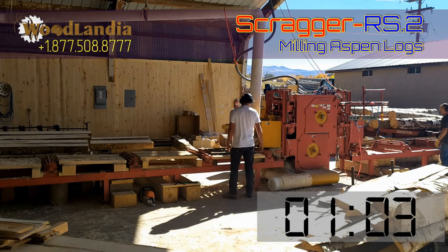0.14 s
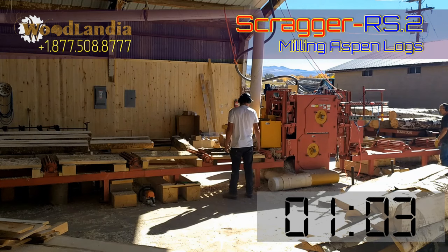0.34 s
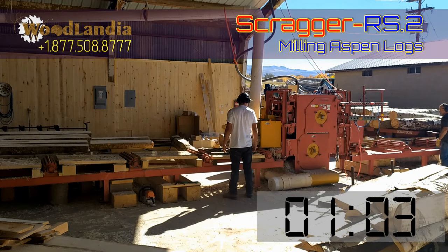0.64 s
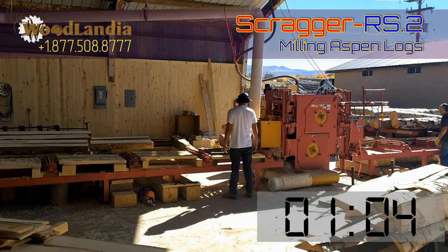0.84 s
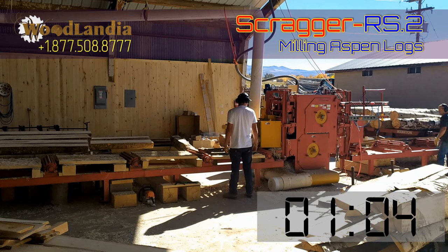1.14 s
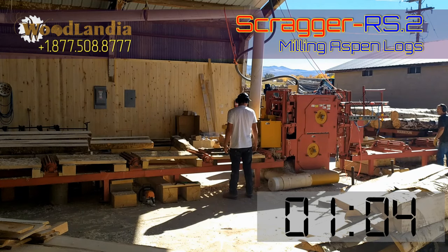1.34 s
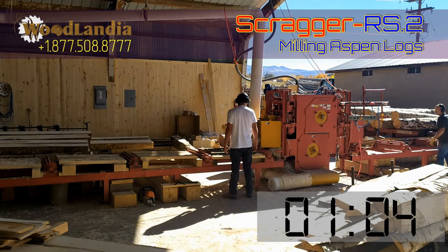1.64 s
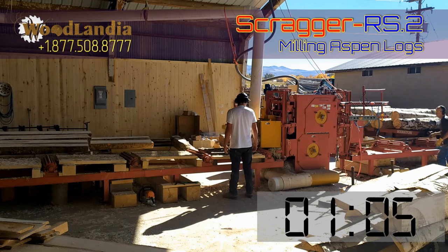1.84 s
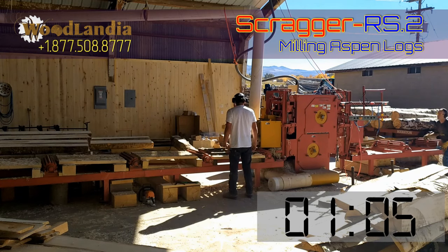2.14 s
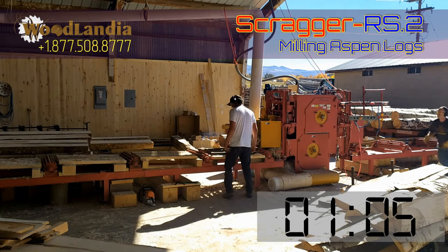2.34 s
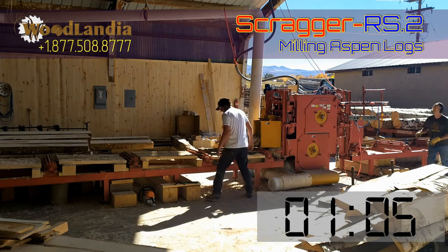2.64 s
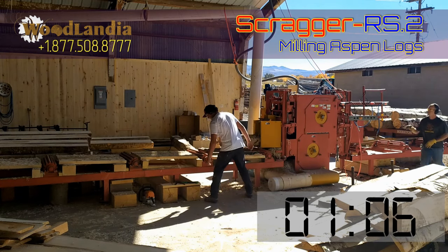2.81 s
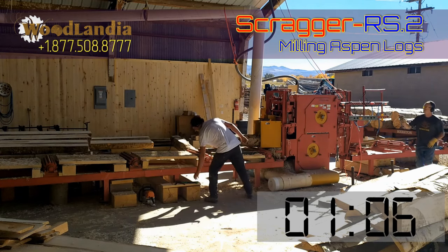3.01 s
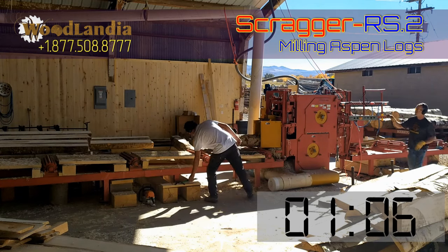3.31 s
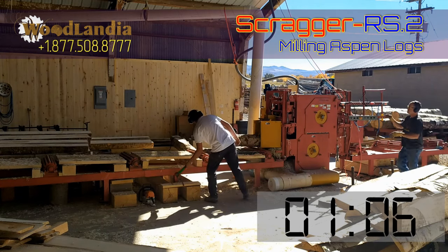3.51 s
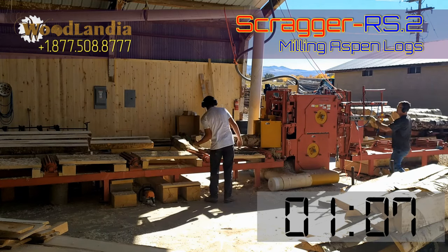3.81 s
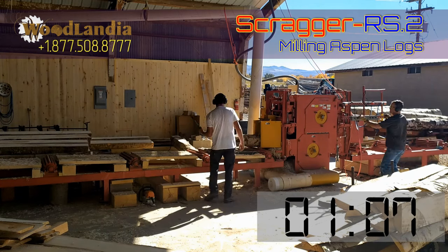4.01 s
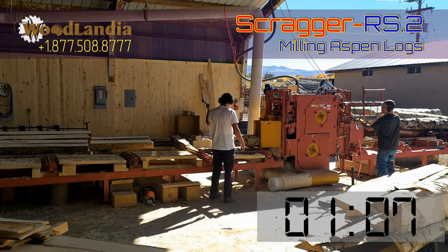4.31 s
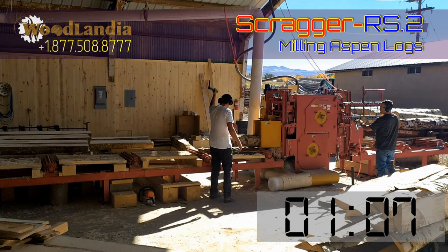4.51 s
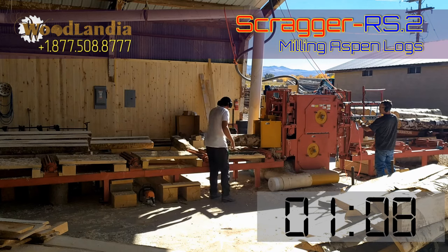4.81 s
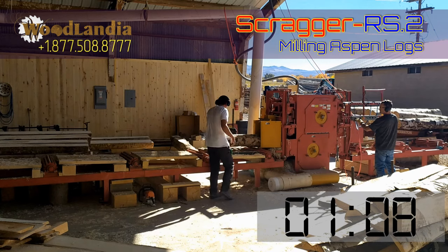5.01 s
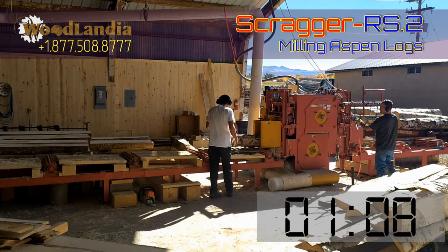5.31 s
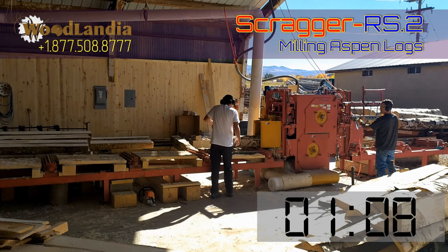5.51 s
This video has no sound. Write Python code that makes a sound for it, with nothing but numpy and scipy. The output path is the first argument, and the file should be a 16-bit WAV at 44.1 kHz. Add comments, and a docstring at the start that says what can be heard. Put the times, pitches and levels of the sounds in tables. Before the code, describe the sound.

A sawmill machine runs throughout in an open-sided shed, heard in wide stereo with thin deep bass. Its hydraulic pump makes a steady buzzing whine, strongest near 900 Hz, with higher whines around 1.1 to 1.3 kHz and a fast throb. Beneath are low hums and steel-frame rumble; above, idling blades hiss, slowly fading. Air valves spit in short whistling bursts with metallic knocks at about 0.3, 0.7-0.85, 2.8 and 4.1 seconds; weaker puffs come near 0.55, 1.7, 1.9 and 2.1. Each leaves a short, dull shed tail. A faint high squeal sings at the start and again around 3.8-4.1. At about 4.65 the blades bite into a log: bright dusty spray, then coarse tearing, groaning and booming in uneven surges, with a momentary dip near 4.9. A rough blade note wavers around 850 Hz, the drive growls, swelling near 5.1, and the pump whine surges near 5.4. Cutting continues to the end at about 5.6.

```python
"""A hydraulic piston pump whines in a sawmill under an open shed roof: sine partials on one pump cycle.
Weaker machine tones drone beside it; the steel frame and the idling blades are shaped noise.
Air valves let off short noise blasts with a dull shed tail, their pipes whistle, and struck steel parts ring.
Near the end the blades bite into a log: noise sprays, wood resonances groan and boom, a blade note and the
drive's growl join in, and the pump changes colour under load."""
import sys
import numpy as np
from scipy import signal
from scipy.io import wavfile

SR = 44100
rng = np.random.default_rng(int(sys.argv[2]) if len(sys.argv) > 2 else 0)


def inscribe(sig):
    """Save sig as 16-bit PCM at rate SR to the path in sys.argv[1].

    A 1-D sig is mono; a 2-D sig holds one channel per row.
    Samples are clipped to [-1, 1] before scaling.
    """
    pcm = np.round(np.clip(np.atleast_2d(sig).T, -1, 1) * 32767)
    wavfile.write(sys.argv[1], SR, pcm.astype(np.int16))


N = 249295
TIME = np.arange(N) / SR   # s

# All levels are relative, ahead of each layer's own gains and movements.
# pump partials: multiple of the pump cycle, level/dB, change under load/dB, left-right/dB
PUMP_PARTIALS = [(1, -43, -7, 0), (2, -45, -4, 4), (3, -34, -7, -1), (5, -36.5, 3, -1), (9, -43, 5, 0),
                 (10, -45, -5, -1), (11, -44, 3, -3), (12, -35, 2, -11), (14, -42, 2, 1), (15, -28, -2, 0),
                 (16, -40, -3, -11), (17, -42, 0, 3), (18, -32, -2, 5), (19, -39, -7, -7), (20, -40, -4, 1),
                 (21, -33.5, .5, -1), (22, -42, 3, -11), (23, -44, -1, -10), (24, -35, -2, -4),
                 (25, -44, -3, -11), (26, -47, -7, -1), (27, -41, -1, -7), (30, -42, 0, -3),
                 (32, -50, -7, -8), (33, -46, 5, -5), (35, -49, -7, -1), (36, -48, 4, 3), (37, -51, 0, 0),
                 (39, -46, -1, -2), (42, -45, 1, -5), (45, -47, 5, -1)]
# partials that grow or fade while the pump idles: multiple of the pump cycle -> slope/(dB per s)
PARTIAL_TRENDS = {5: 1.2, 9: 2, 21: 1.3, 24: -.9}
# movement of the pump's main whine: t/s, level/dB
MAIN_WHINE = [(0.0, 4), (2.08, 0.5), (3.32, 2), (3.6, -2), (3.95, 0.5), (4.3, -3), (4.62, -1), (4.71, -5),
              (4.77, -1), (4.84, -15), (5.0, 1.5), (5.13, 4), (5.25, -5), (5.4, 9.5), (5.53, -3),
              (5.65, -11)]
# thin high overtones of the piston rate: multiple of the pump cycle, level/dB
SIZZLE_PARTIALS = [(48, -47.5), (51, -48.5), (54, -50), (57, -51), (60, -45), (63, -47), (66, -48),
                   (69, -52), (72, -48), (75, -47), (78, -51), (81, -53), (84, -49), (87, -48), (90, -53),
                   (93, -50), (99, -51), (102, -49), (105, -48), (108, -47)]
# weaker steady tones beside the pump's main partials (shaft sidebands, belts, a hum neighbour): f/Hz, level/dB
SIDE_DRONES = [(68, -50), (87.7, -41.5), (99.6, -46), (147.5, -46.5), (155.7, -41), (260, -46.5),
               (293.6, -41.5), (355.6, -42), (379.8, -45.5), (519.5, -44.5), (559.7, -48), (739.4, -41.5),
               (799.5, -45), (859.4, -65), (1399.3, -44)]
# resonances of the steel frame: f/Hz, width/Hz, level/dB
FRAME_RESONANCES = [(62.3, 19, -44), (148, 13.4, -39.5), (183, 21, -37.5), (294.3, 31, -41),
                    (544, 26, -42.5)]
# noise spectra of frame, idling blades, air jet, sawdust and groaning wood: f/Hz, level/(dB per Hz)
RUMBLE_SPECTRUM = [(25, -66), (42, -77), (62, -56.5), (100, -56), (175, -54), (240, -57), (320, -55.5),
                   (500, -63), (850, -59.5), (1250, -61.5), (2000, -69.5), (5000, -84.5)]
HISS_SPECTRUM = [(300, -103), (1000, -63), (1800, -64), (2600, -64.5), (4000, -65.5), (6000, -68),
                 (8700, -67), (10000, -89.5), (12500, -79.5)]
AIR_SPECTRUM = [(500, -59.5), (800, -57), (1300, -57.5), (1800, -60.5), (2600, -57.5), (4500, -59.5),
                (6500, -59.5), (9000, -59.5), (10500, -70), (12500, -78)]
SPRAY_SPECTRUM = [(600, -86), (1600, -61.5), (2500, -59.5), (4000, -60), (6000, -64.5), (8700, -63),
                  (10000, -75), (12500, -73.5)]
GROAN_SPECTRUM = [(350, -72), (480, -53.5), (650, -62.5), (850, -52), (1100, -65), (1500, -56), (3000, -91)]
# faint high pump overtones that stand out for a moment: start t/s, end t/s, f/Hz, level/dB
PUMP_SQUEALS = [(0, .7, 3100, -42), (3.76, 4.15, 3778, -38)]
# air blasts: t/s, level/dB, opening/s, blowing/s, tilt/dB (added to treble, taken off bass),
# pipe f/Hz, pipe level/dB
VALVE_BLASTS = [(.235, -11, 0.013, 0.06, -5, 3000, -38), (0.323, -5, 0.007, 0.07, -5, 3040, -29),
                (.545, -19, .01, 0.03, 7, 3070, -51), (.72, -0.5, 0.015, 0.052, 0.5, 2530, -24.5),
                (.822, -10, 0.0073, .036, -8, 2480, -27), (1.695, -14.5, .009, .036, 4, 2550, -55),
                (1.89, -11, .013, .031, 1, 2550, -55), (2.13, -17, .01, .03, 9, 2550, -55),
                (2.764, -0.7, 0.026, 0.055, 1, 3150, -28), (2.85, -14, 0.009, 0.03, -10, 3160, -29),
                (4.124, -2, 0.0044, 0.055, -2, 2490, -32), (4.22, -15.5, .01, 0.1, -8, 2380, -31)]
# knocks of the air-driven steel parts: t/s, level/dB
STEEL_KNOCKS = [(0.333, -4), (.724, -4), (.757, 0), (.83, -7), (2.769, -5), (2.797, -1), (2.865, -2),
                (2.912, -11), (4.128, -3), (4.182, -2)]
# ringing of those parts: f/Hz, level/dB, t60/s
STEEL_RINGS = [(1110, -36, .06), (1840, -35, 0.061), (2190, -34, 0.049), (2410, -31, .08),
               (3210, -31, 0.043), (3870, -37, .09), (4480, -30, .07), (5120, -35, .07), (6450, -35, .06)]
# resonances of the log and carriage under the teeth: f/Hz, width/Hz, level/dB
LOG_RESONANCES = [(254, 18, -36.5), (299, 20, -36), (347, 13, -42), (712.6, 9.5, -33), (785, 16, -36),
                  (848, 19, -40), (884, 35, -31), (1024, 25, -43), (1414, 20, -37), (1627, 45, -33)]
# moments when the teeth dig in harder: t/s, half length/s, extra groan/dB, extra boom/dB, extra chips/dB
TOOTH_SURGES = [(4.8, .045, 1, 3, -1), (4.995, 0.02, 2, 7, 4), (5.095, 0.048, 0, 3, 3),
                (5.18, .035, 0.5, 4, -2.5), (5.308, 0.036, -0.5, 5.5, 1), (5.386, .045, 0.5, 5, -1),
                (5.556, 0.048, -2.5, 3, 0)]
# note of a blade in the wood: t/s, f/Hz, level/dB
BLADE_PITCH = [(4.66, 880, -54), (4.71, 868, -29), (4.8, 846, -37), (4.88, 800, -39), (4.98, 850, -38),
               (5.1, 833, -40), (5.24, 849, -32), (5.35, 825, -41), (5.45, 851, -38), (5.59, 848, -34),
               (5.65, 838, -34)]
# growl of the loaded drive: multiple of its pitch, level/dB
GROWL_PARTIALS = [(4, -37), (5, -41), (8, -41), (9, -39), (10, -34), (11, -34), (14, -40), (16, -39),
                  (18, -37), (20, -39), (21, -37), (24, -41)]
# likeness of the two sides in the noises: f/Hz, correlation
SIDE_LIKENESS = [(60, 0.88), (180, 0.85), (350, 0.77), (700, 0.28), (1400, 0.076), (2800, 0.082),
                 (5500, -0.21), (9000, 0.0083)]
# which side the banded noises lean to: f/Hz, left-right/dB
SIDE_LEAN = [(60, 2), (160, 1), (1000, 2), (2000, -1.5), (4000, -0.5), (8000, 0.5), (12000, 2.5)]
# how far the left side leads in the standing waves of the shed: f/Hz, lead/rad
SIDE_LEAD = [(60, 0), (430, -0.56), (720, -1.68), (900, 0.78), (1080, 1), (1260, 2.0), (1440, 1.22),
             (1800, 2), (2330, 1.0), (3500, 1.5), (5000, 4.5)]

# pump cycle rate: the motor sags a little under load
IDLE_HZ, LOADED_HZ = 59.97, 59.8
# multiples of the pump cycle that carry the main whine, the upper whines and the low hum
MAIN_ORDER, UPPER_ORDERS, HUM_ORDER = 15, (18, 21), 5
# the upper whines sink under load, then swell once deep in the cut
UPPER_LOAD_DB, PEAK_S, PEAK_HALF_S, PEAK_DB = -4, 5.45, 0.21, 11
# the low hum swells and fades at random
HUM_DB, HUM_WAVER_DB, HUM_WAVER_HZ = 1.5, 1.3, 7
# the blades meet the log; then the groan, the boom and the pump's load build up
BITE_S, BITE_RISE_S, GROAN_RISE_S, BOOM_RISE_S, LOAD_RISE_S = 4.645, 0.062, 0.14, 0.16, 0.358
SPRAY_DB, GROAN_DB, BOOM_DB = -0.54, -2, -2.5
BOOM_TOP_HZ = 400   # log resonances below this boom, the others groan
# the noise of the cut dips for an instant; the depth is the share that drops out
SKIP_S, SKIP_HALF_S, SKIP_DEPTH = 4.893, 0.0088, 0.7
# pitch of the drive's growl, and its one swell
GROWL_HZ, GROWL_S, GROWL_HALF_S = 179.2, 5.085, 0.06
CUTOFF_HZ = 12700
LEFT_RIGHT = np.array([[1], [-1]])


def from_db(db):
    """Decibels to gain."""
    return np.exp(np.asarray(db) * (np.log(10) / 20))


def in_time(rows):
    """One curve over all samples for each column after the time."""
    s, *columns = np.transpose(rows)
    return [np.interp(TIME, s, column) for column in columns]


def at_hz(points, hz):
    """Read a curve on a log-frequency axis."""
    f, value = np.transpose(points)
    return np.interp(np.log(hz), np.log(f), value)


def ramp(start_s, rise_s):
    """Rise from 0 to 1 and hold."""
    return np.clip((TIME - start_s) / rise_s, 0, 1)


def fall(start_s, decay_s):
    """Hold 1, then die away exponentially."""
    return np.exp(-np.clip((TIME - start_s) / decay_s, 0, 20))


def swell(s, half_s):
    """A bell-shaped swell of height 1."""
    return np.exp(-np.minimum(((TIME - s) / half_s) ** 2, 50))


def drift(rate_hz):
    """Random movement of spread 1: noise smoothed by two equal poles, drawn every 100 samples."""
    r = np.exp(-200 * np.pi * rate_hz / SR)
    draws = rng.standard_normal(N // 100 + 1002)
    slow = signal.lfilter([1], [1, -2 * r, r * r], draws)[1000:]   # drop the filter's start
    return np.interp(np.arange(N) / 100, np.arange(len(slow)), slow / slow.std())


def random_phase():
    """Any point of a turn, in radians."""
    return rng.uniform(0, 2 * np.pi)


def filtered(x, kind, hz, order=1):
    """Butterworth filter."""
    return signal.sosfilt(signal.butter(order, hz, kind, fs=SR, output="sos"), x)


def banded_noise(spectrum, flicker_db):
    """Stereo noise in narrow bands over the span of a spectrum, each band flickering on its own."""
    out, edges = np.zeros((2, N)), np.geomspace(34, 13500, 21)
    white = rng.standard_normal((2, 2, N)) * np.sqrt(SR / 2)   # 0 dB per Hz
    for k, (low, high) in enumerate(zip(edges, edges[1:])):
        if spectrum[0][0] >= high or low >= spectrum[-1][0]:
            continue
        hz = np.sqrt(low * high)
        mid, side = filtered(white[k % 2], "band", [low, high], 2)   # neighbours use separate noise
        alike = at_hz(SIDE_LIKENESS, hz)
        lean_db = at_hz(SIDE_LEAN, hz) * LEFT_RIGHT / 2
        gain = from_db(at_hz(spectrum, hz) + flicker_db * drift(21.0) + lean_db)
        out += gain * (np.sqrt((1 + alike) / 2) * mid + np.sqrt((1 - alike) / 2) * side * LEFT_RIGHT)
    return out


def ringing_noise(hz, width_hz):
    """Stereo noise ringing in one two-pole resonance; rms 1."""
    r, alike = np.exp(-np.pi * width_hz / SR), at_hz(SIDE_LIKENESS, hz)
    poles = [1, -2 * r * np.cos(2 * np.pi * hz / SR), r * r]
    mid, side = signal.lfilter([1, 0, -1], poles, rng.standard_normal((2, N)))
    out = np.sqrt(1 + alike) * mid + np.sqrt(1 - alike) * side * LEFT_RIGHT
    return out / out.std()


def wandering(x, share, rate_hz):
    """Bend pitch up and down at random by reading the sound on an uneven clock."""
    clock = np.arange(N) + share * SR / (2 * np.pi * rate_hz) * drift(rate_hz)
    return np.array([np.interp(clock, np.arange(N), side) for side in x])


def tone(phase, hz, level_db, pan_db):
    """A stereo sine; reflections set the two sides apart in level and phase."""
    lead = at_hz(SIDE_LEAD, hz) * LEFT_RIGHT / 2
    sides = from_db(pan_db * LEFT_RIGHT / 2)
    angle = (phase - 2 * np.pi * np.floor(phase / (2 * np.pi)) + lead).astype(np.float32)
    return 2 * sides / np.linalg.norm(sides) * from_db(level_db) * np.sin(angle)


def pump(cycle, load, waver_db=0.5, strain=0.55, shudder_db=1.6):
    """Piston strokes give a pulsed buzz with one ruling whine; load shifts its colour and shakes its pitch."""
    bite, peak = ramp(BITE_S, BITE_RISE_S), swell(PEAK_S, PEAK_HALF_S)
    whine_db, = in_time(MAIN_WHINE)
    upper_db = UPPER_LOAD_DB * load + PEAK_DB * peak
    upper_db += waver_db * drift(2.4) + shudder_db * bite * drift(9.1)
    hum_db = HUM_DB + HUM_WAVER_DB * drift(HUM_WAVER_HZ)
    swells = {MAIN_ORDER: whine_db, HUM_ORDER: hum_db, **dict.fromkeys(UPPER_ORDERS, upper_db)}
    struggle = bite * (1 - peak)   # the shaking eases at the upper whines' peak
    shake = drift(11) * struggle * strain / MAIN_ORDER   # strain: radians at the main whine
    out = np.zeros((2, N))
    for order, level_db, load_db, pan_db in PUMP_PARTIALS:
        # high overtones of the stroke rate (every third order) start closer in step than the others
        scatter = 2.4 if order % 3 or order < 12 else 1.3
        phase = order * (cycle + shake) + scatter * rng.uniform(-0.76, 1)
        swell_db = swells.get(order, waver_db * drift(1.6))
        trend_db = PARTIAL_TRENDS.get(order, 0) * (TIME - BITE_S / 2) * (1 - load)
        out += tone(phase, order * IDLE_HZ, level_db + swell_db + trend_db + load * load_db, pan_db)
    # the pistons differ, so the buzz throbs once and twice each shaft turn (three cycles)
    return out * (1 + 0.05 * np.cos(cycle / 3) + 0.12 * np.cos(2 * cycle / 3))


def pump_rattle(cycle, level_db=-41.0, ring_hz=2700, width_hz=1900, sharpness=14, delay_turns=0.11):
    """Each pressure pulse shakes the pipes: a short bright noise tick once a cycle."""
    gate = np.exp(sharpness * (np.cos(cycle - 2 * np.pi * delay_turns) - 1))
    band = [ring_hz - width_hz / 2, ring_hz + width_hz / 2]
    ticks = filtered(gate * rng.standard_normal((2, N)), "band", band, 2)
    return from_db(level_db) * ticks / ticks.std()


def pump_sizzle(cycle, load, load_db=2, waver_db=1.5, pan_db=-3):
    """Thin high overtones of the piston rate come and go, and harden under load."""
    out = np.zeros((2, N))
    for order, level_db in SIZZLE_PARTIALS:
        moving_db = level_db + load_db * load + waver_db * drift(1.0)
        out += tone(order * cycle + random_phase(), order * IDLE_HZ, moving_db, pan_db)
    return out


def side_drones(waver_db=3.5, slip_rad=0.13):
    """Weaker machine tones drone, slightly unsteady in phase and level."""
    out = np.zeros((2, N))
    for hz, level_db in SIDE_DRONES:
        phase = 2 * np.pi * hz * TIME + slip_rad * drift(2.2) + random_phase()
        out += tone(phase, hz, level_db + waver_db * drift(3.6), 0)
    return out


def frame(load, load_db=-4):
    """The shaken steel frame rumbles as broad noise and noise in its resonances, which ease under load."""
    modes = sum(from_db(level_db) * ringing_noise(hz, width_hz) for hz, width_hz, level_db in FRAME_RESONANCES)
    return from_db(load_db * load) * modes + banded_noise(RUMBLE_SPECTRUM, flicker_db=1.1)


def blade_hiss(level_db=-1.2, waver_db=0.6, fade_db_per_s=0.66):
    """The spinning blades hiss in the air as noise, slowly fading throughout."""
    moving_db = level_db - fade_db_per_s * (TIME - BITE_S / 2) + waver_db * drift(4.9)
    return from_db(moving_db) * banded_noise(HISS_SPECTRUM, flicker_db=1.7)


def pump_squeals(waver_db=2):
    """A high pump overtone sings faintly for a moment: a sine under a rounded envelope."""
    out = np.zeros((2, N))
    for start, end, hz, level_db in PUMP_SQUEALS:
        progress = np.clip((TIME - start) / (end - start), 0, 1)
        sine = tone(2 * np.pi * hz * TIME + drift(1.5), hz, level_db + waver_db * drift(8), 0)
        out += sine * np.sqrt(np.abs(np.sin(np.pi * progress)))
    return out


def air_blasts(shut_s=0.021, shed_t60=0.67, shed_db=1.5, pivot_hz=4000, tail_cut_hz=8000,
               sputter_db=-0.3, spit=1.0, spit_s=0.0085):
    """A valve opens with a spit, sputters and shuts; the shed holds a duller tail of each blast."""
    air = banded_noise(AIR_SPECTRUM, flicker_db=-0.5)
    dull = filtered(air, "low", pivot_hz)
    low, high = np.zeros(N), np.zeros(N)
    for s, level_db, open_s, blow_s, tilt_db, *_ in VALVE_BLASTS:
        flow = ramp(s, open_s) * fall(s + blow_s, shut_s) * (1 + spit * fall(s, spit_s))
        low += from_db(level_db - tilt_db) * flow
        high += from_db(level_db + tilt_db) * flow
    jet = (dull * low + (air - dull) * high) * from_db(sputter_db * drift(61))
    keep = from_db(-120 / (shed_t60 * SR))   # energy, hence twice 60 dB
    tail = np.sqrt(signal.lfilter([1 - keep], [1, -keep], low * high))
    echo = filtered(np.roll(air, SR, axis=1), "low", tail_cut_hz)   # diffuse: unrelated to the jet
    return jet + from_db(shed_db) * tail * echo


def valve_pipes(strike_s=0.005, ring_s=0.044, width_hz=380, whistle_db=-5, waver_hz=100, waver_rate_hz=60):
    """Each valve sets its pipe ringing as it opens: a rough, wavering whistle in a noisy resonance."""
    out = np.zeros((2, N))
    for s, _, _, blow_s, _, pipe_hz, pipe_db in VALVE_BLASTS:
        half_blow = blow_s * 0.5
        ring = ramp(s, strike_s) * fall(s + half_blow, ring_s + half_blow)
        phase = 2 * np.pi * np.cumsum(pipe_hz + waver_hz * drift(waver_rate_hz)) / SR
        whistle = tone(phase, pipe_hz, whistle_db, 0)
        out += from_db(pipe_db) * ring * (whistle + 0.6 * ringing_noise(pipe_hz, width_hz))
    return out


def knocks(rattle_s=0.053, rattles_per_s=420, rattle_db=-9, crack_db=-18.0, crack_s=0.003):
    """Steel parts knock as the valves throw them: a noise crack, then a strike and rattle ringing in modes."""
    strikes, chatter, crack = np.zeros(N), np.zeros(N), np.zeros(N)
    for s, level_db in STEEL_KNOCKS:
        start, gain = int(s * SR), from_db(level_db)
        since = TIME[:N - start]
        strikes[start] = gain
        chatter[start:] += gain * np.exp(-np.minimum(since / rattle_s, 20))
        crack[start:] += gain * np.exp(-np.minimum(since / crack_s, 20))
    clicks = strikes + from_db(rattle_db) * chatter * (rng.random(N) < rattles_per_s / SR)
    out = from_db(crack_db) * filtered(crack * rng.standard_normal((2, N)), "band", [1200, 6000])
    for hz, level_db, t60 in STEEL_RINGS:
        r, w = from_db(-60 / (t60 * SR)), 2 * np.pi * hz / SR
        hits = clicks * rng.choice([-1, 1], (2, N)) + 1e-18   # the offset keeps the filter fast
        out += from_db(level_db) * signal.lfilter([0, np.sin(w)], [1, -2 * r * np.cos(w), r * r], hits)
    return out


def log_cut(flutter_db=0.25, wander=0.0125, tear_db=1.5, tear_hz=90, dust_hz=4500, dust_db=3, dust_s=0.28):
    """Blades throw fine dust first, then tear out coarser chips; the log groans and booms in uneven surges."""
    grip = ramp(BITE_S, BITE_RISE_S) * (1 - SKIP_DEPTH * swell(SKIP_S, SKIP_HALF_S))
    teeth = ramp(BITE_S, GROAN_RISE_S)   # more teeth enter the wood
    dig_db, heave_db, chips_db = sum(np.outer(extra_db, swell(s, half_s))
                                     for s, half_s, *extra_db in TOOTH_SURGES)
    grain_db = 1.5 * drift(18)
    tearing_db = tear_db * drift(tear_hz)
    groan = grip * teeth * from_db(GROAN_DB + dig_db + tearing_db)
    boom = grip * ramp(BITE_S, BOOM_RISE_S) * from_db(BOOM_DB + heave_db + grain_db)
    sawdust = banded_noise(SPRAY_SPECTRUM, flicker_db=1.64)
    coarse = filtered(sawdust, "low", dust_hz)
    dust = (sawdust - coarse) * from_db(dust_db * swell(BITE_S, dust_s))
    chips = coarse * teeth * from_db(chips_db + tearing_db)
    out = grip * from_db(SPRAY_DB + flutter_db * drift(14)) * (dust + chips)
    for hz, width_hz, level_db in LOG_RESONANCES:
        force = boom if hz < BOOM_TOP_HZ else groan
        out += from_db(level_db) * force * wandering(ringing_noise(hz, width_hz), wander, 3)
    return out + groan * banded_noise(GROAN_SPECTRUM, flicker_db=3.5)


def blade_note(waver_hz=14, rough_db=3):
    """In the wood a blade sings one sine whose pitch bends and wavers and whose level is rough."""
    note_hz, note_db = in_time(BLADE_PITCH)
    phase = 2 * np.pi * np.cumsum(note_hz + waver_hz * drift(12.15)) / SR
    return ramp(BITE_S, BITE_RISE_S) * tone(phase, note_hz.mean(), note_db + rough_db * drift(27), 0)


def drive_growl(rest=0.23, jitter_rad=0.13, rough_db=3.5):
    """The loaded drive growls: rough harmonics that hold a low level and swell up once."""
    cycle = 2 * np.pi * GROWL_HZ * TIME + jitter_rad * drift(8)
    growl = np.zeros((2, N))
    for order, level_db in GROWL_PARTIALS:
        growl += tone(order * cycle + random_phase(), order * GROWL_HZ, level_db + rough_db * drift(22), 0)
    return growl * (rest * ramp(BITE_S, LOAD_RISE_S) + swell(GROWL_S, GROWL_HALF_S))


def scene(pump_db=-0.46):
    """Pump, drones, frame, blades, valves and log together; one load curve drives pump and frame."""
    load = ramp(BITE_S, LOAD_RISE_S)
    cycle = 2 * np.pi * np.cumsum(IDLE_HZ + load * (LOADED_HZ - IDLE_HZ)) / SR
    hydraulics = from_db(pump_db) * pump(cycle, load) + pump_rattle(cycle) + pump_sizzle(cycle, load)
    idling = side_drones() + frame(load) + blade_hiss() + pump_squeals()
    valves = air_blasts() + valve_pipes() + knocks()
    cutting = log_cut() + blade_note() + drive_growl()
    return hydraulics + idling + valves + cutting


def record(dry, low_cut_hz=46):
    """The microphone drops the deep bass; a steep filter cuts the top."""
    thin = filtered(dry, "high", low_cut_hz, 4)
    return signal.sosfilt(signal.ellip(10, 0.2, 90, CUTOFF_HZ, fs=SR, output="sos"), thin)


dry = scene()
out = record(dry)
inscribe(out)
```